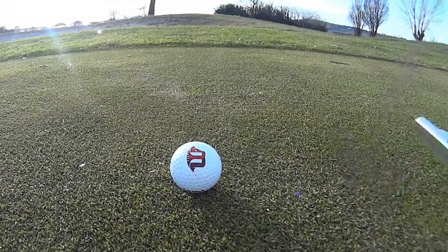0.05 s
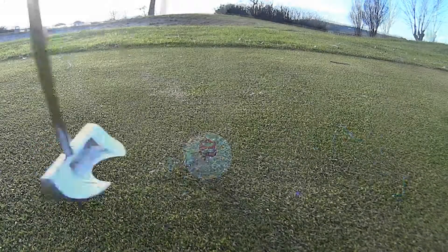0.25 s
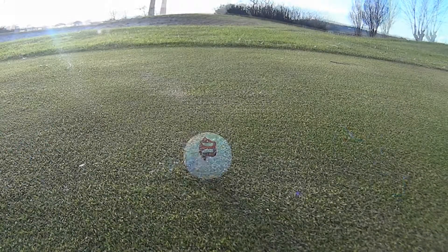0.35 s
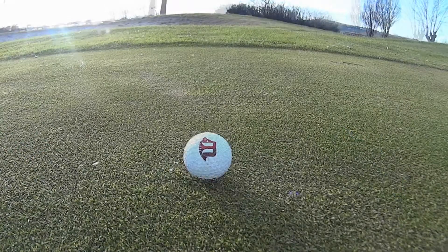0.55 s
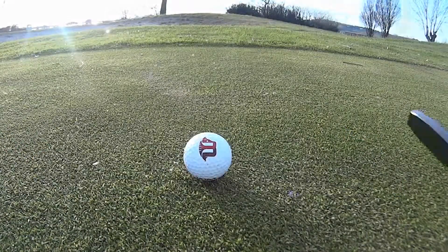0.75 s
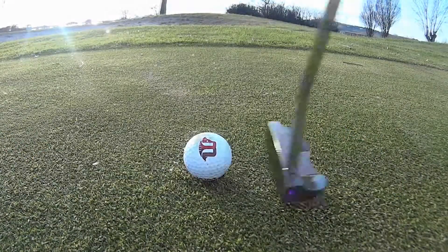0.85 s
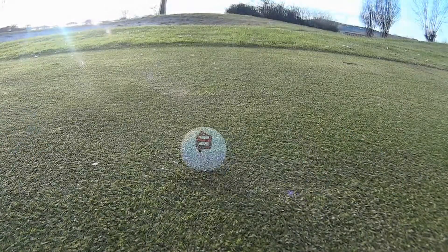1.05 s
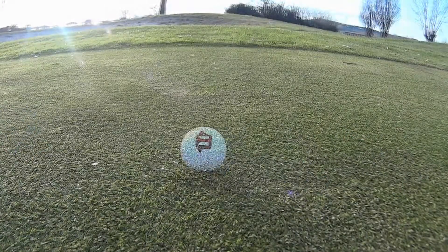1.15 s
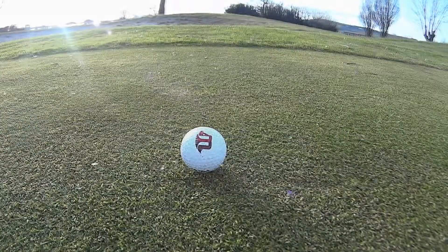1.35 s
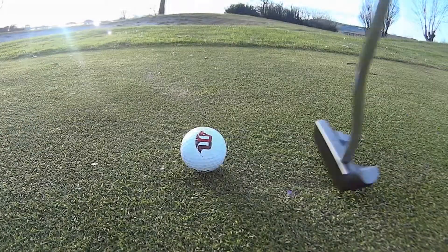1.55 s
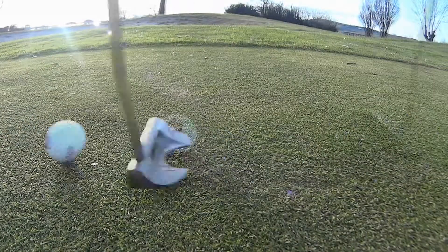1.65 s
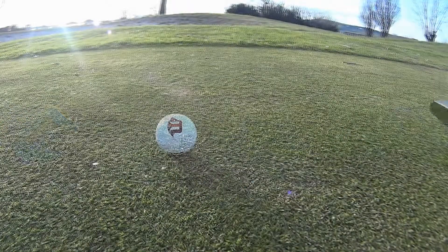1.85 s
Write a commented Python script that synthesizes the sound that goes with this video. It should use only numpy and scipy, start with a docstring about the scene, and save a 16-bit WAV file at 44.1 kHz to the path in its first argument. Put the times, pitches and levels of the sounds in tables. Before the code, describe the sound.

A putter strikes a golf ball three times, each a sharp, short clack with a slightly different metallic ring. The ball faintly brushes the grass after each stroke, over soft outdoor hiss, heard close up at ground level.

```python
"""Three putts on a green, a few centimetres from the microphone of a small camera lying on the grass.
Quiet outdoor air comes first, with a brighter hiss that swells around each stroke. At 0.2 s the first
putter meets the ball: a hard, very short clack, the ring of the head, a brief low ring and a faint hum.
The turf answers with a dull knock and a soft wash, then the ball brushes down on the grass.
Two more strokes follow at 0.9 s and 1.6 s, each with the ring of a different putter head."""
import sys
import numpy as np
from scipy import signal
from scipy.fft import rfft, irfft
from scipy.io import wavfile

SR = 44100
rng = np.random.default_rng(int(sys.argv[2]) if len(sys.argv) > 2 else 0)


def store_pcm(level_fs):
    """Save levels as 16-bit WAV."""
    pcm = np.round(np.clip(level_fs, -1, 1) * 32767).astype(np.int16)
    wavfile.write(sys.argv[1], SR, np.atleast_2d(pcm).T)


N = 83790

# the strokes: t/s, level/dB, clack tilt/(dB per octave), clack t60 factor, knock/dB, wash/dB, wash t60/s
PUTTS = [(0.2074, 5, .4, 0.76, -49, -44.5, 0.12), (0.8999, 1.5, 3, 0.96, -62, -47, 0.1),
         (1.6357, 3.5, -0.5, 0.9, -49, -53, 0.094)]
# struck modes: f/Hz, relative level/dB, t60/s, left over right/dB, polarity
CLACK_MODES = [(1270, -13.5, 0.0014, -15, 1), (1643, -21, 0.0085, 7.5, 1), (2050, -14, 0.0064, 11.5, -1),
               (3293, -33.5, 0.013, -11, 1), (3990, -25.5, 0.014, 6, 1), (4370, -20.5, 0.0029, 6, 1),
               (5630, -23, 0.0064, 6, 1), (7110, -33.5, 0.0074, -13, 1), (9070, -20, 0.0021, -2, 1),
               (10320, -31.5, 0.0046, -9, 1)]  # face on ball, common to all strokes
FIRST_HEAD_MODES = [(3915, -23, .012, 4, 1), (4350, -18, .005, 1, 1), (6158, -47, .16, 0, 1)]
SECOND_HEAD_MODES = [(1500, -39, .035, 0, 1), (3940, -21.5, .013, 2, 1), (6884, -30.5, .032, 0, 1),
                     (10255, -34, .023, -4, 1)]
THIRD_HEAD_MODES = [(1450, -37, .026, 0, 1), (3700, -21, .0035, 1, 1), (4860, -11.5, .0029, 0, 1),
                    (6760, -28.3, .04, 1, 1), (9806, -42.6, .025, -2, 1), (11010, -47, .055, 0, 1)]
FIRST_PUTTER_LOW_MODES = [(183, -60, 0.5, 2, 1), (980, -46.5, 0.045, 2, 1)]
# hollows in the click, so close to the ground and the camera: f/Hz, width/Hz, depth/dB
HOLLOWS = [(2480, 1280, -11), (3660, 310, -9.5), (5430, 890, -7.5), (6500, 120, -13)]
# the ball brushing down on the grass: t/s, half length/s, level/dB
LANDINGS = [(0.26, 0.015, -55), (.957, 0.011, -54.5), (1.702, 0.0072, -56)]
# swells of the hiss: peak t/s, rise/s, fall/s, treble level/dB, midrange level/dB
HISS_SWELLS = [(0.259, 0.18, 0.18, -57, -60.5), (1.028, 0.28, 0.23, -60.5, -60.5),
               (1.71, 0.17, 0.19, -59.5, -64)]
# noise colours at the microphone: f/Hz, relative spectral level/dB
TURF_WASH_COLOUR = [(100, -31), (400, -3.5), (1000, 0.5), (2000, 4.5), (3000, -7.5), (4500, 0.5),
                    (8000, -11.5), (11000, -6)]
TURF_KNOCK_COLOUR = [(60, -28), (150, -8), (450, 4), (900, 6), (1600, -13), (5000, -41)]
GRASS_BRUSH_COLOUR = [(80, -10), (250, -2), (900, -8), (2200, -0.5), (3800, -8.5), (4800, -4.5),
                      (8000, -12), (10500, -11)]
TREBLE_HISS_COLOUR = [(1000, -8), (3100, -2), (3750, -5), (4400, 0), (4850, 2), (5400, -5.5), (6050, -1.5),
                      (6600, -7), (7400, -5), (8150, -9), (9050, -2), (9900, -4.5), (10600, -6)]
MID_HISS_COLOUR = [(150, -8), (1400, 3), (1750, -1.5), (2150, 2), (2600, -8.5), (3200, 0.5), (4000, -65),
                   (9000, -26)]
AIR_COLOUR = [(25, -14), (70, -2), (130, -1), (300, 2), (1000, -3), (2100, -4), (2800, -7.5), (4200, -13.5),
              (6000, -12.5), (8000, -14.5), (11000, -21)]
# likeness of left and right in all the noises: f/Hz, correlation
STEREO_LIKENESS = [(60, .8), (130, 0.7), (270, -0.19), (580, -0.52), (1230, -0.34), (2600, 0.04),
                   (5540, 0.41), (11000, 0.54)]

TILT_PIVOT_HZ = 3000
RADIATION_HZ = 1314  # ball and head are too small to radiate well below this
SCATTER_DB, SCATTER_T60_S = -41, 0.032  # level relative to the stroke
KNOCK_ATTACK_S, KNOCK_T60_S = 0.012, 0.16
AIR_DB = -62.3
TOP_HZ, EDGE_HZ = 11125, 250  # the camera's treble limit and the width of its edge


def strokes():
    """The face meets the ball: a clack and the ring of that putter's head, thin and hollow so close."""
    clicks = 0
    heads = FIRST_HEAD_MODES, SECOND_HEAD_MODES, THIRD_HEAD_MODES
    for (start, db, tilt_db, t60_factor, *_), head in zip(PUTTS, heads):
        clack = ring(CLACK_MODES, start, tilt_db, t60_factor)
        clicks += undb(db) * (clack + ring(head, start))
    low_cut = signal.butter(8, RADIATION_HZ, "high", fs=SR, output="sos")
    clicks = signal.sosfiltfilt(low_cut, clicks)
    for hz, width, depth_db in HOLLOWS:
        band = signal.lfilter(*signal.iirpeak(hz, hz / width, fs=SR), clicks)
        clicks += (undb(depth_db) - 1) * band
    return clicks


def low_ring():
    """The first putter gives a brief low ring and a faint, longer hum."""
    return ring(FIRST_PUTTER_LOW_MODES, start=PUTTS[0][0])


def turf():
    """Quick scatter from the grass and the camera body, a soft wash and a dull knock off the turf."""
    wash, knock = noise(TURF_WASH_COLOUR), noise(TURF_KNOCK_COLOUR)
    out = 0
    for start, db, _, _, knock_db, wash_db, wash_t60 in PUTTS:
        out += wash * undb(db + SCATTER_DB) * decay(start, SCATTER_T60_S)
        out += wash * undb(wash_db) * decay(start, wash_t60)
        attack = np.clip(since(start) / KNOCK_ATTACK_S, 0, 1)
        out += knock * undb(knock_db) * attack * decay(start, KNOCK_T60_S)
    return out


def landings():
    """The ball brushes the grass after its short skip."""
    touches = sum(undb(db) * swell(time, half, half) for time, half, db in LANDINGS)
    return noise(GRASS_BRUSH_COLOUR) * touches


def outdoor_air():
    """Steady air over the green, and a brighter hiss that swells around each stroke."""
    treble, midrange = noise(TREBLE_HISS_COLOUR), noise(MID_HISS_COLOUR)
    hiss = 0
    for peak, rise, fall, treble_db, mid_db in HISS_SWELLS:
        hiss += swell(peak, rise, fall) * (undb(treble_db) * treble + undb(mid_db) * midrange)
    return undb(AIR_DB) * noise(AIR_COLOUR) + hiss


def ring(modes, start, tilt_db=0, t60_factor=1):
    """Damped modes struck at one instant, each with its own place between left and right."""
    out = 0
    for hz, db, t60, pan_db, polarity in modes:
        gain = np.sign(polarity) * undb(db + tilt_db * np.log2(hz / TILT_PIVOT_HZ))
        wave = gain * decay(start, t60 * t60_factor) * np.sin(2 * np.pi * hz * since(start))
        out += wave * undb([[pan_db / 2], [-pan_db / 2]])
    return out


def noise(colour):
    """Stereo noise of rms 1 with the given colour; left and right are alike as in open air."""
    f = np.arange(N // 2 + 1) * SR / N
    alike = np.clip(at_hz(STEREO_LIKENESS, f), -1, 1)
    white = rfft(rng.standard_normal((2, N)))
    coloured = white * undb(at_hz(colour, f)) * (f < TOP_HZ)
    mid, side = coloured * np.sqrt([1 + alike, 1 - alike])
    stereo = irfft(np.array([mid + side, mid - side]), N)
    return stereo / np.sqrt(np.mean(stereo ** 2))


def decay(start, t60):
    """A sudden start and an exponential fall."""
    t = since(start)
    return (t >= 0) * np.exp(-np.log(1000) * np.maximum(t, 0) / t60)


def swell(peak, rise, fall):
    """A smooth, bell-shaped rise and fall."""
    t = since(peak)
    return np.exp(-.5 * (t / np.where(t < 0, rise, fall)) ** 2)


def since(start):
    """Seconds from a moment."""
    return np.arange(N) / SR - start


def at_hz(points, f):
    """Read (f/Hz, value) points on a log-frequency axis."""
    hz, value = np.array(points, float).T
    return np.interp(np.log(np.maximum(f, 1)), np.log(hz), value)


def undb(db):
    """Decibels to gain."""
    return 10 ** (np.asarray(db) / 20)


def scene():
    """Three putts on the quiet green, heard close up at grass height."""
    return strokes() + low_ring() + turf() + landings() + outdoor_air()


def record(dry):
    """The camera cuts the top steeply."""
    f = np.arange(N // 2 + 1) * SR / N
    passband = np.clip(.5 + (TOP_HZ - f) / EDGE_HZ, 0, 1)
    return irfft(rfft(dry) * passband, N)


dry = scene()
out = record(dry)
store_pcm(out)
```